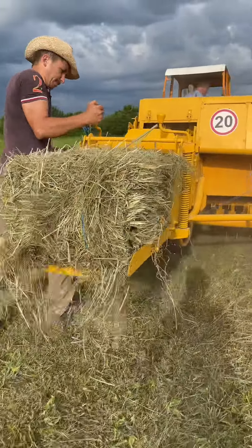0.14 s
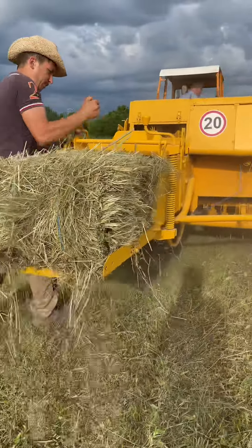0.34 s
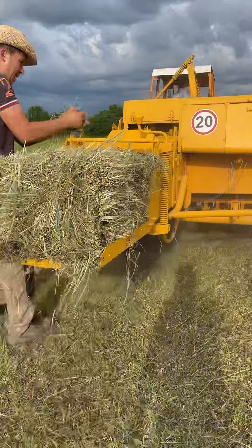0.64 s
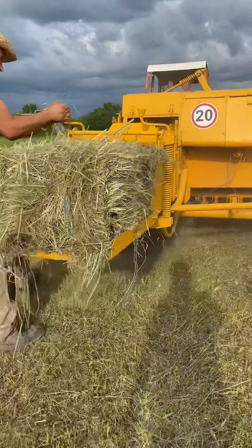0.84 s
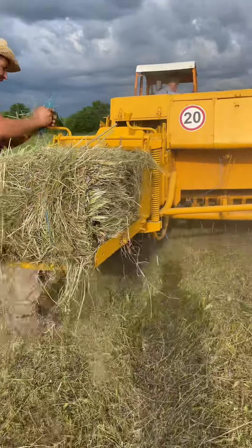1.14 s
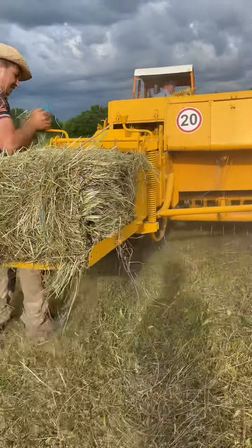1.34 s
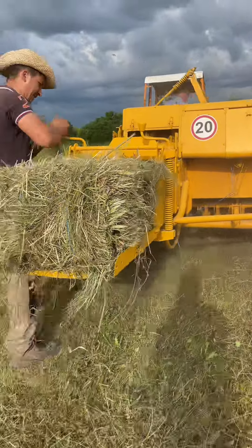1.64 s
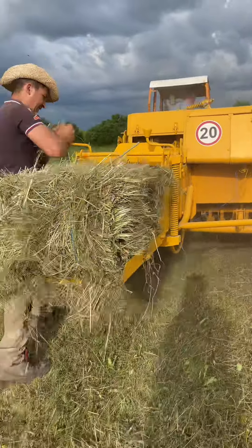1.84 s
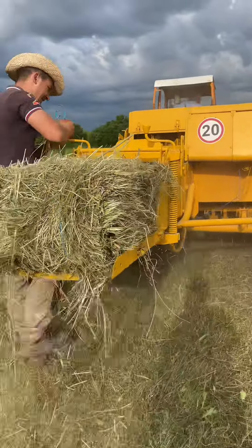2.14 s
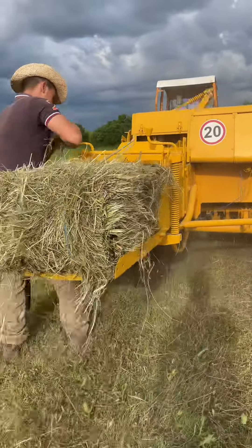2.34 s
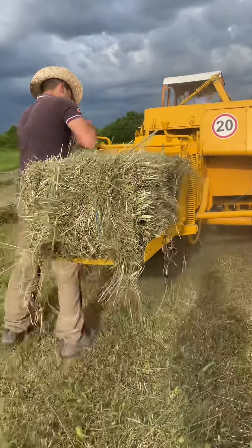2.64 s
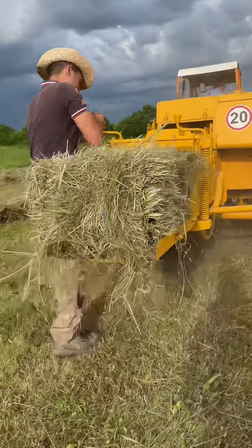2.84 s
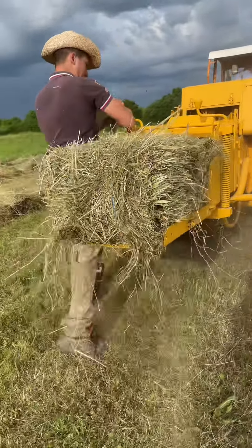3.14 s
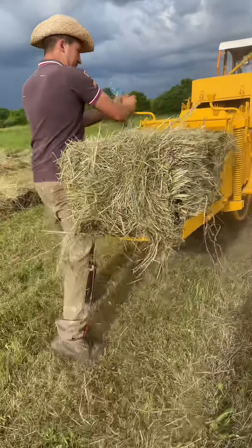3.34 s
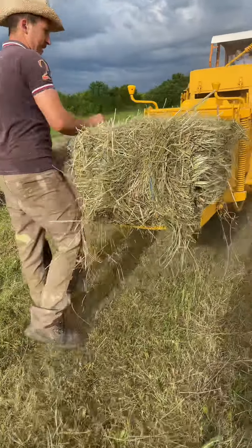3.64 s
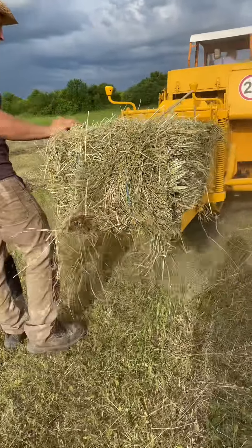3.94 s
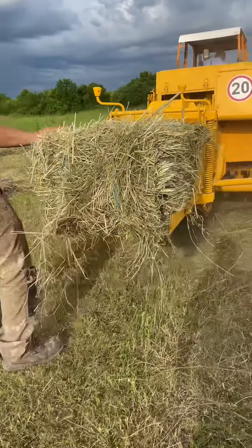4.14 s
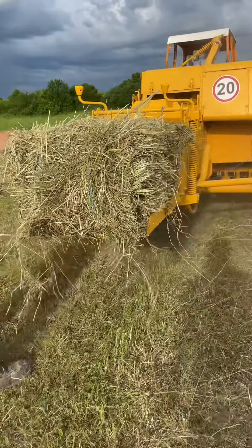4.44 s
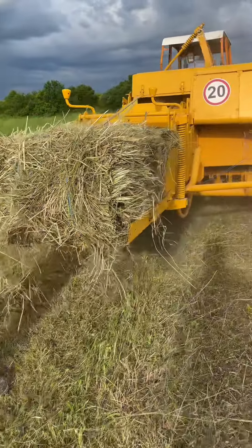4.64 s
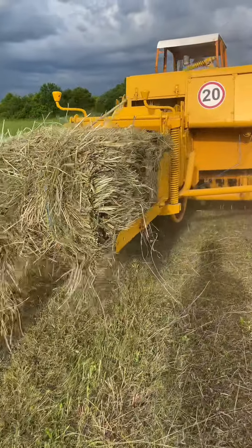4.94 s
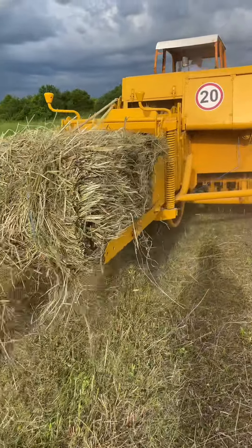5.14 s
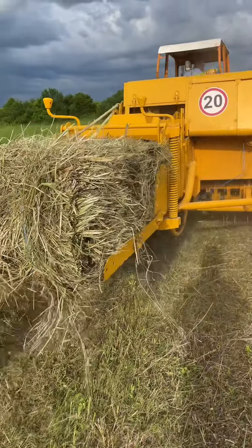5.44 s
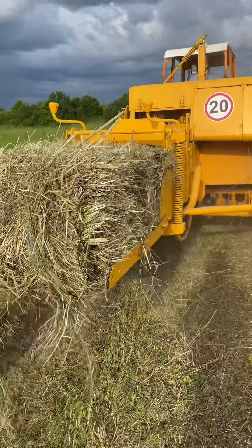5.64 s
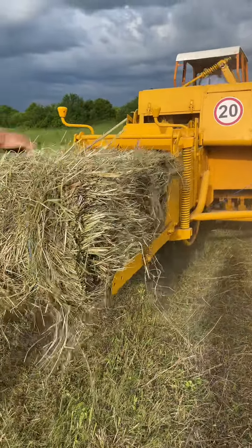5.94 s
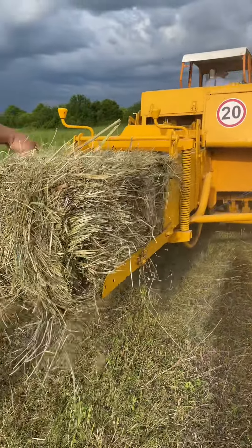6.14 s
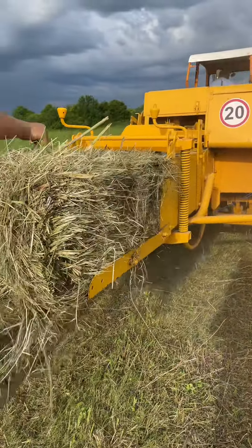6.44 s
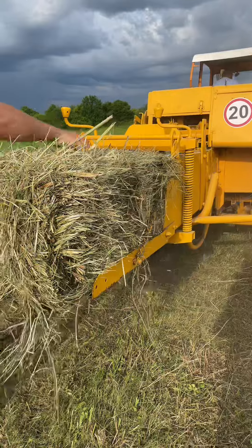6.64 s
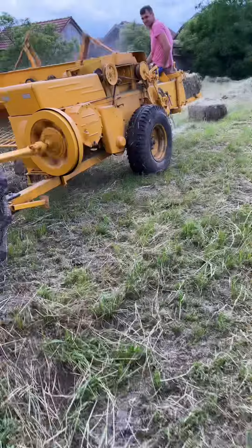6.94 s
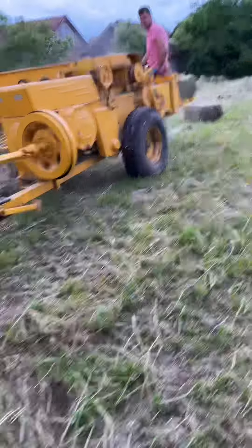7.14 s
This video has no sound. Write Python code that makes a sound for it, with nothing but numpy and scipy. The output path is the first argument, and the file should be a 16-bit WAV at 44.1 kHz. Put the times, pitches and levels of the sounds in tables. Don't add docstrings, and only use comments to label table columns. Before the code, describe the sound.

Outdoors in a hay field, close behind a working baler. A diesel drones and sags with each plunger stroke, sheet steel drums, chains and tines rattle, forks clank irregularly and dry joints give short squeaks. A hard knock lands about once a second. Near seven seconds the sound drops out for an instant, then a denser, brighter clatter from the machine's side closes it. Stereo handheld microphone, loud and slightly crushed.

```python
import sys
import numpy as np
from scipy import signal
from scipy.fft import rfft, irfft, next_fast_len
from scipy.io import wavfile
from scipy.ndimage import uniform_filter1d, map_coordinates

SR = 44100
rng = np.random.default_rng(int(sys.argv[2]) if len(sys.argv) > 2 else 0)


def store_pcm(level_fs):
    pcm = np.round(np.clip(level_fs, -1, 1) * 32767).astype(np.int16)
    wavfile.write(sys.argv[1], SR, np.atleast_2d(pcm).T)


def invert_db(x):
    u = np.asarray(x, float) / 20
    return 10 ** u


N = 320607

# time in seconds, firing rate in Hz, throttle level in dB.
ENGINE = [(0.0, 47.76, -21), (0.29, 54.77, -31.5), (0.55, 51.77, -29.5), (0.81, 51.16, -34),
          (1.22, 58.34, -22), (1.46, 57.2, -40), (1.8, 46.09, -19.5), (2.37, 56.98, -31.5),
          (2.74, 46.33, -23.5), (2.95, 51.8, -20), (3.28, 53.3, -28), (3.8, 39.65, -22),
          (4.29, 48.92, -22.5), (4.6, 43.76, -37), (4.9, 35.75, -21.5), (5.15, 45.51, -19),
          (5.49, 51.74, -26.5), (6.98, 42.83, -28.5)]
# frequency in Hz, level in dB per Hz.
EXHAUST = [(25, -39.5), (45, -7.5), (70, -1), (100, 1), (145, 0.5), (170, -4.5), (200, 0), (235, -6.5),
           (275, -9), (310, -7), (360, -12.5), (450, -20.5), (600, -27.5), (1000, -54.5)]
# share of the stroke from 0 to 1, load in dB, # exhaust boom in
# dB, chain slack in dB. From .83 onward the values of the knock row hold.
STROKE = [
    (0, 0, -13, 2.5),
    (.08, -2, -4, -1),
    (.18, 0.5, 3, -0.5),
    (.42, 1, -3.5, 2.5),
    (.64, -8, -0.5, 0.5),
    (.8, 1, 6, 4),
    (.88, 1, -4, 0),
    (.91, 3, -13.5, 3.5),
    (.96, -1.5, -9, 2),
]
# time in seconds, level in dB.
FEED = [(0, 2), (.8, 0.5), (2.2, -0.5), (4, -2), (5.2, -1), (5.85, 0), (6.1, -3), (6.42, -6), (6.6, -2),
        (6.8, -14), (6.98, -18)]
# start in seconds, peak in dB, T60 in seconds.
PLUNGER = [
    (0.839, -11, 0.16),
    (1.74, -15, 0.15),
    (2.706, -11, 0.21),
    (3.677, -13, 0.12),
    (4.832, -9, 0.14),
    (5.915, -11, 0.21),
    (6.245, -16.5, 0.1),
]
# frequency in Hz, level in dB per Hz.
THUMP = [(150, -39), (300, -5), (700, 3.5), (900, 0.5), (1300, 0.5), (2000, -9.5), (3000, -12.5),
         (4000, -19.5), (5000, -25), (9000, -38)]
# resonance in Hz, width in Hz, level in dB.
PANELS = [
    (673, 52, 13),
    (885, 120, -1),
    (1330, 95, -13.5),
    (308, 70, -17.5),
]
# frequency in Hz, level in dB per Hz.
DRUM = [(200, -39), (400, 1), (550, -5.5), (780, -0.5), (1000, -2), (1400, -10.5), (2000, -15), (3000, -17),
        (5000, -44.5)]
# frequency in Hz, level in dB per Hz.
CHAINS = [(600, -29), (1500, 0), (2400, -1.5), (3000, -1), (4400, -5.5), (5500, -7.5), (6500, -8),
          (8000, -11), (9000, -13), (10500, -17), (12000, -23), (13500, -27), (15600, -25.5)]
# start in seconds, peak in dB, ring in Hz, rattle stirred up in dB.
FORKS = [(0.153, -4, 1743, -28), (0.291, -23, 1870, -32), (0.445, -21, 1560, -47),
         (0.5925, -19, 1960, -35.5), (0.625, -18.5, 1190, -35.5), (1.025, -8.5, 1614, -30.5),
         (1.285, -12, 2093, -46), (1.473, -21.5, 1860, -38), (1.755, -10.5, 1870, -49.5),
         (1.8765, -13.5, 2130, -34.5), (1.9248, -25, 1600, -44), (2.8299, -13, 2166, -32),
         (2.9086, -8.5, 1700, -40), (3.1513, -13.5, 1265, -48.5), (3.251, -16.5, 1220, -36.5),
         (3.3364, -16, 1414, -40), (3.845, -18, 1744, -31), (4.025, -15.5, 900, -49),
         (4.371, -13, 1477, -49), (5.145, -15.5, 1526, -29), (5.175, -11, 1446, -36.5),
         (5.282, -21, 1590, -40), (5.744, -24, 1420, -40.5), (6.2197, -26, 1980, -34),
         (6.8712, -27.5, 1573, -48), (1.07, -15, 998, -42.5), (1.2, -20, 850, -48),
         (3.795, -20, 1510, -51.5), (3.822, -16.5, 993, -37.5), (5.188, -13.5, 896, -50.5),
         (6.232, -22, 1197, -44)]
# start in seconds, peak in dB, ring in Hz, rattle stirred up in dB.
LINKS = [(0.237, -7.5, 2840, -53), (0.31, -25, 2740, -43.5), (0.398, -22, 3120, -27.5),
         (1.1073, -14, 4890, -61), (1.429, -16, 3060, -32.5), (2.0836, -23.5, 2780, -28),
         (2.347, -22.5, 3610, -31), (2.21, -19, 2355, -48), (2.3866, -20.5, 3370, -44.5),
         (2.531, -13.5, 2310, -47), (2.713, -13, 3670, -41.5), (2.998, -25.5, 2950, -37.5),
         (3.46, -25, 2500, -37.5), (3.69, -29.5, 3600, -67), (4.085, -13.5, 4370, -31.5),
         (4.221, -15, 4920, -63), (4.407, -17.5, 2500, -35), (4.43, -16, 2350, -38.5),
         (4.454, -17.5, 5480, -55), (4.986, -16, 2500, -35.5), (4.952, -25.5, 2550, -38.5),
         (5.453, -18, 3160, -32.5), (5.555, -14, 3210, -43.5), (5.697, -16.5, 3610, -46),
         (6.286, -21, 3090, -56), (6.52, -26, 3430, -40), (6.6832, -27.5, 2450, -36.5),
         (6.79, -23, 2210, -43), (6.933, -14, 5560, -37), (0.934, -24.5, 3500, -40.5),
         (1.255, -21.5, 3290, -39), (1.305, -20, 2275, -49), (3.558, -18, 3010, -42.5),
         (3.768, -26.5, 3750, -57), (3.875, -21.5, 2580, -45.5), (3.905, -23, 2300, -53),
         (5.015, -21, 3000, -48), (5.21, -20.5, 2250, -46), (3.6, -24, 2590, -55)]
# start in seconds, length in seconds, pitch in Hz, level in dB, overtones in dB.
SQUEAKS = [(0.219, 0.017, 2780, -23, -24), (0.788, 0.024, 2047, -21.5, -9.5),
           (0.855, 0.033, 2008, -9.5, -9.5), (0.886, 0.1, 2008, -24.5, -30.5),
           (0.886, 0.035, 2015, -33, 1.5), (1.673, 0.025, 2049, -22, -5.5), (2.622, 0.026, 2055, -22.5, -6),
           (2.898, 0.022, 1680, -22, -23), (3.576, 0.016, 2080, -22, -6.5), (3.689, 0.074, 2865, -29, -3.5),
           (4.09, 0.054, 3000, -29.5, -10), (4.151, 0.031, 2996, -25, -10.5), (4.318, 0.16, 2990, -36, -28),
           (4.584, 0.042, 2223, -23, -13), (4.734, 0.026, 2027, -21, -7), (4.84, 0.076, 3800, -39, 2),
           (5.461, 0.1, 3190, -29.5, -23.5), (5.821, 0.028, 1997, -18.5, -9),
           (5.937, 0.075, 3840, -32, -14), (6.452, 0.085, 3526, -27, -10)]
# start in seconds, peak in dB, pitch in Hz.
BOOMS = [(0.17, -2, 184), (0.763, -17.5, 208), (1.025, -7, 150), (1.189, -7, 136), (1.638, -11, 146),
         (1.941, -3.5, 151), (2.627, 0.5, 190.6), (2.855, -7, 310), (2.989, -15.5, 131), (3.81, -9.5, 170),
         (4.842, -14.5, 203.5), (5.195, -4, 172), (5.794, 0, 185), (6.003, -15, 160), (0.27, -11.5, 103),
         (0.621, -6.5, 196.5), (0.93, -6, 104), (1.101, -3, 209), (1.972, -10, 201), (2.5, -10, 109.4),
         (3.5, -8.5, 199), (3.861, -3.5, 88), (4.17, -12, 202.6), (4.7, -8.5, 126), (5.07, -9.5, 89),
         (5.65, -16.5, 308), (5.8, -8.5, 101), (6.03, -10.5, 252), (6.128, -11, 96), (6.28, -8, 150),
         (6.42, -8.5, 99.6)]
# start in seconds, peak in dB, ring in Hz, T60 in seconds.
PINGS = [(0.227, -14.5, 2810, .06), (0.292, -19.5, 6400, 0.071), (0.31, -18.5, 2790, 0.027),
         (0.31, -12.5, 4620, 0.042), (0.572, -24, 2840, .04), (0.83, -22, 4020, .03),
         (0.933, -27, 3620, .03), (1.013, -22, 2860, 0.033), (1.406, -24.5, 3100, 0.11),
         (1.575, -28, 2130, .04), (1.58, -23, 4080, 0.045), (1.857, -23, 2020, .03), (1.9, -25, 6200, .05),
         (1.995, -23, 6300, 0.037), (1.99, -22, 3070, .05), (2.082, -20.5, 4260, 0.057),
         (2.13, -28, 6270, .2), (2.265, -29, 5530, .1), (2.36, -25, 6300, .06), (2.704, -26, 5580, 0.088),
         (2.82, -22, 3060, .04), (2.835, -22.5, 3080, .1), (3.198, -26, 1690, 0.036),
         (3.659, -28.5, 1680, .03), (4.167, -19.5, 3020, 0.044), (4.818, -22, 2840, 0.033),
         (4.831, -18.5, 2760, .05), (5.133, -26, 3190, .04), (5.273, -17, 2790, 0.048),
         (5.793, -22, 3580, .04), (5.817, -16.5, 6460, .07), (5.85, -28.5, 4120, 0.11),
         (5.941, -23, 980, 0.036), (5.946, -23, 1470, 0.046), (6.04, -23, 2590, 0.067),
         (6.135, -24.5, 847, .15), (6.255, -17, 910, 0.093), (6.295, -24.5, 5780, 0.065),
         (6.41, -27.5, 2800, .05), (6.478, -21, 3540, 0.087), (0.237, -16, 4570, .025),
         (0.24, -19, 1490, .025), (0.165, -22, 3260, .12), (2.908, -18, 1710, .03), (2.715, -24, 3880, .05),
         (4.453, -21, 6140, .04), (5.176, -17, 2900, .03), (4.845, -16.5, 854, .12), (3.69, -18, 700, 0.13),
         (1.03, -22, 3110, .06)]
# time in seconds, clatter in dB, drumming in dB.
BESIDE = [
    (6.986, -22, -24.5),
    (7.01, -17, -20.5),
    (7.27, -25.5, -23),
]
# frequency in Hz, level in dB per Hz.
SIDE_DRUM = [(30, -53), (55, -13), (85, 2), (200, -3), (300, -6.5), (450, -10.5), (800, -68)]
# frequency in Hz, level in dB per Hz.
SIDE_STEEL = [(200, -24), (450, -7.5), (800, -5.5), (1000, -9.5), (1400, -7), (2000, -11.5), (3000, -7),
              (4400, -18), (5500, -23.5), (6500, -23.5), (8000, -29.5), (10500, -26), (13500, -36),
              (15600, -38)]
# start in seconds, peak in dB.
SIDE_HITS = [
    (6.986, -10.5),
    (7, -8),
    (7.015, -3.5),
    (7.026, -11),
    (7.05, -14.5),
    (7.116, -18.5),
    (7.25, -18),
]
# frequency in Hz, level in dB.
SIDE_TONES = [
    (85, -27),
    (235, -29),
    (425, -28),
    (480, -31.5),
    (629, -27.5),
    (1324, -36.5),
]
# frequency in Hz, left over right in dB,
# left lead in radians, likeness from 0 to 1.
BEHIND = [(60, 0, .06, 1), (307, 0, .03, 1), (405, 0, -.1, 1), (455, -1, -0.95, 1), (598, 4.5, 0.8, 0.82),
          (736, 1.5, -0.5, 1), (1090, 2, 0.5, 0.99), (2000, 1.7, 0, 0.96), (2500, 0, 0, 0.86),
          (3020, -6.5, 1.1, 0.1), (3750, -3.5, 0.12, 0.73), (4400, -1.5, 0.83, 0.5),
          (6200, 0.5, 1.29, 0.69), (9020, 0.5, 3, 0.73), (10700, 1.5, 2.5, 0.95), (13500, -3.5, 3, 0.93),
          (15500, -1, 4.5, 0.5)]
# frequency in Hz, left over right in dB,
# left lead in radians, likeness from 0 to 1.
ABREAST = [(302, 0.5, 0.063, 1), (454, -2.5, 0.94, 0.93), (585, -1, 1.4, 0.44), (780, 4, 1.6, 0.3),
           (1014, 11, .3, 0.51), (1390, 5, 0.44, 0.97), (2500, 2.5, 2.5, 0.83), (3300, -0.5, 2.65, 0.95),
           (3450, 0, 3.0, .995), (3750, 0, 3.2, .995), (3950, 1.5, 3.5, 0.74), (4380, 2.5, 3.3, 0.43),
           (5460, 1, 0.72, 0.78), (6470, 0.5, 1.1, 0.5), (9140, -2.5, 2.95, 0.63), (10000, -3, 3.1, 1),
           (13800, 3.5, 3.14, 0.97), (15700, -0.5, 3.6, 0.52)]
# frequency in Hz, level in dB per bin.
MID_FLOOR = [(3000, -88), (3600, -71), (4200, -90), (7000, -100), (8300, -83), (9300, -68.5),
             (10000, -65.5), (14000, -67.5), (15200, -83.5)]
# frequency in Hz, level in dB per bin.
SIDE_FLOOR = [(200, -73.5), (400, -86.5), (1000, -65.5), (1700, -69), (2500, -78.5), (11000, -95.5),
              (13000, -86), (15000, -73.5)]
SHARP = [.295, 1.112, 1.775, 4.222, 4.465]

GAP_START_S, GAP_END_S = 6.9762, 6.9846


def unit(x):
    return x / np.sqrt(np.mean(x ** 2) + 1e-20)


def columns(rows, at):
    first, *cols = np.transpose(rows)
    return [np.interp(at, first, c) for c in cols]


def curves(rows):
    return columns(rows, np.arange(N) / SR)


def along(points, hz):
    p = np.array(points, float)
    return columns(np.column_stack([np.log(p[:, 0]), p[:, 1:]]), np.log(hz + 1))


def wobble(rate):
    knots = rng.standard_normal(int(N * 400 / SR) + 4)
    return map_coordinates(knots, [np.arange(N) * min(rate, 400) / SR])


def wander(*shape):
    return np.cumsum(rng.standard_normal(shape), axis=-1)


def decay(t, t60):
    return invert_db(-60 * t / t60)


def span(s, length):
    return slice(round(s * SR), round(s * SR) + length)


def filtered(x, response):
    m = next_fast_len(x.shape[-1] + SR // 8)
    return irfft(rfft(x, m) * response(np.fft.rfftfreq(m, 1 / SR)), m)[..., :x.shape[-1]]


def rush(spectrum, patchy_db, gate=1, size=N):
    z = signal.stft(rng.standard_normal((2, size)) * gate, nperseg=512)[2]
    field = uniform_filter1d(rng.standard_normal(z.shape[1:]), 5, 0)
    field = uniform_filter1d(field, 6, 1)
    pair = signal.istft(z * invert_db(patchy_db * unit(field)), nperseg=512)[1][:, :size]
    return unit(filtered(pair, lambda hz: invert_db(along(spectrum, hz)[0])))


def stroke():
    knocks = [-.06] + [row[0] for row in PLUNGER[:-1]] + [6.98]
    phase = np.interp(np.arange(N) / SR, knocks, np.arange(len(knocks))) % 1
    return columns(STROKE + [(0.83, *STROKE[0][1:])], phase)


def engine(rough, puff_share):
    hz, throttle_db = curves(ENGINE)
    load_db, boom_db, _ = stroke()
    feed_db, = curves(FEED)
    first_db = -28.5 + boom_db + 0.99 * (throttle_db - throttle_db.mean()) + 0.6 * (hz - hz.mean())
    half_db = -28.5 + 0.52 * load_db
    turn = np.cumsum(hz) / SR
    orders = 0
    for k, db in ((1, first_db + .1), (3 / 2, half_db - 0.5), (2, throttle_db), (4, throttle_db - 12)):
        level = invert_db(db + 0.5 + 0.24 * feed_db + 2.8 * rough * wobble(7))
        orders = orders + level * np.sin(2 * np.pi * k * turn + rough * 0.25 * k * wobble(9))
    fired = np.diff(np.floor(turn + .05 * wobble(40)), prepend=0) > 0
    uneven = fired * invert_db(6.5 * wobble(60))
    pulses = unit(filtered(uneven, lambda f: invert_db(along(EXHAUST, f)[0]) * (f > 120)))
    puffs = rush(EXHAUST, patchy_db=1.12, gate=invert_db(np.cos(2 * np.pi * turn)))
    drumming = np.sqrt(1 - puff_share) * pulses + np.sqrt(puff_share) * puffs
    return orders + invert_db(-17 + load_db + feed_db) * drumming


def steel(f):
    return sum((-1) ** k * invert_db(db) * 1j * f * w / (c * c - f * f + 1j * f * w)
               for k, (c, w, db) in enumerate(PANELS))


def plunger():
    t, out = np.arange(SR // 3) / SR, np.zeros((2, N))
    ringing = unit(filtered(rng.standard_normal((2, N)), steel))
    body = invert_db(1.5 * wobble(76)) * (rush(DRUM, patchy_db=5.0) + 0.7 * ringing)
    thump = rush(THUMP, patchy_db=-2.5)
    for s, db, t60 in PLUNGER:
        at = span(s, len(t))
        crack = decay(np.maximum(t - .006, 0), 0.017) * np.clip(t / 0.003, 0, 1)
        shudder = decay(t, 1.52 * t60) * np.clip(t / 0.0011, 0, 1)
        for shape, noise, level in ((crack, thump, -3), (shudder, body, -8)):
            out[:, at] += invert_db(db + level) * np.sqrt(np.mean(shape ** 2)) * unit(shape * noise[:, at])
    return out


def surges(rise_s, t60):
    s, _, _, db = np.transpose(FORKS + LINKS)
    t = np.arange(SR // 2) / SR
    kicks = np.bincount(np.round(s * SR).astype(int), invert_db(db), N)
    return np.abs(signal.fftconvolve(kicks, np.clip(t / rise_s, 0, 1) * decay(t, t60))[:N])


def rattle():
    load_db, _, slack_db = stroke()
    feed_db, = curves(FEED)
    surge = surges(rise_s=0.017, t60=0.24)
    chain = invert_db(-41 + slack_db + feed_db) + surge + invert_db(-55)
    panel = invert_db(-30 + 0.92 * load_db + feed_db) + invert_db(-2) * surge + invert_db(-45.5)
    shake = wobble(22.04)
    other_shake = np.roll(shake, N // 3)[::-1]
    ticks = invert_db(np.minimum(6 * rng.exponential(size=N), 18)) * (rng.random(N) < .01)
    ticks = signal.lfilter([1], [1, -.97], ticks)
    panels = panel * invert_db(1.56 * shake + 0.94 * other_shake) * rush(DRUM, patchy_db=1.5)
    chains = rush(CHAINS, patchy_db=3.0, gate=1 + 0.32 * unit(ticks))
    return panels + chain * invert_db(5.0 + 1.57 * shake) * chains


def clanks(t60):
    burst, shove, ring = np.zeros(N + SR), np.zeros((2, N + SR)), np.zeros((2, N + SR))
    t = np.arange(SR // 5) / SR
    fall = decay(t, t60) * (1 - np.exp(-t / 0.003))
    gather = 1 - np.exp(-t / .007)
    for s, db, hz, _ in FORKS + LINKS:
        at = span(s, len(t))
        burst[at] += invert_db(db - 12.0) * fall * gather + invert_db(db - 10.5) * fall ** 6
        shove[:, at] += invert_db(db - 4.5) * fall ** 3 * rng.standard_normal((2, len(t)))
        blur = wander(2, len(t)) * 0.11 * (hz / 2000) ** 0.91
        turn = 2 * np.pi * hz * t
        tone = np.sin(turn + blur) + 0.57 * np.sin(1.62 * turn + 2 * blur)
        ring[:, at] += invert_db(db - 8.0) * (0.75 * fall ** 0.87 + 0.89 * fall ** 3) * tone
    return burst[:N] * rush(CHAINS, patchy_db=0.0) + filtered(shove[:, :N], steel) + ring[:, :N]


def squeaks(flutter_db):
    out = np.zeros((2, N + SR))
    t, drift = np.arange(SR // 3) / SR, wobble(300)
    flutters = [wobble(110) for _ in range(3)]
    for s, length, hz, db, over_db in SQUEAKS:
        second_db = over_db - 1.1 * max(db + 19.5, 0)
        third_db = over_db - 10.5 * (hz / 1000 - 2)
        at = span(s, len(t))
        rough = .03 / length + .4 - .1 * max(db + 24, 0) + .1 * np.clip(-28 - db, 0, 5)
        rough = np.clip(rough, .35, 2)
        if length > .09 and db > -27:
            rough = rough * .35
        release = decay(np.maximum(t - length, 0), .045)
        grip = np.clip(t / (0.15 * length), 0, 1) * invert_db(-4 * t / length) * release
        turn = np.cumsum(hz * (1 + .008 * rough * drift[at])) / SR
        short = length < .05
        blur = wander(5, len(t)) * (.03 + .035 * rough ** 2 if short else .018 * rough)
        for k, level in enumerate((0, second_db, third_db, third_db - 8, third_db - 8)):
            uneven = grip * invert_db(flutter_db * rough * flutters[k % 3][at])
            size = invert_db(db + level) * np.sqrt(np.mean(grip ** 2)) * unit(uneven)
            smear = (k + 1) ** (1 if short else .5) * blur[k]
            out[:, at] += size * np.sin(2 * np.pi * ((k + 1) * turn + rng.random((2, 1))) + smear)
    return out[:, :N]


def booms(t60, rise_s):
    out, t = np.zeros(N + SR), np.arange(SR // 4) / SR
    shape = decay(t, t60) * (1 - np.exp(-t / rise_s))
    for s, db, hz in BOOMS:
        blur = wander(len(t)) * 0.031
        out[span(s, len(t))] += invert_db(db - 3.5) * shape * np.sin(2 * np.pi * hz * t + blur)
    return out[:N] * [[1], [0]]


def pings(rise_s):
    out, t = np.zeros((2, N + SR)), np.arange(SR // 5) / SR
    for s, db, hz, t60 in PINGS:
        blur = wander(2, len(t)) * 0.07 * np.sqrt(hz / 2000)
        shape = decay(t, t60) * (1 - np.exp(-t / rise_s))
        out[:, span(s, len(t))] += invert_db(db) * shape * np.sin(2 * np.pi * hz * t + blur)
    return out[:, :N]


def ports(pair, table):
    def gains(hz):
        lean_db, lead, alike = along(table, hz)
        turn = np.arccos(np.clip(alike, 0, 1)) / 2
        left = invert_db(lean_db / 2) * np.exp(.5j * lead)
        return np.array([[left * np.cos(turn), left * np.sin(turn)],
                         [np.cos(turn) / left, -np.sin(turn) / left]])
    return filtered(pair, gains).sum(1)


def side_view():
    start = round(GAP_END_S * SR)
    t = np.arange(start, N) / SR
    steel_db, drum_db = (c[start:] for c in curves(BESIDE))
    drum = invert_db(drum_db) * rush(SIDE_DRUM, patchy_db=-3.5, size=N - start)
    teeth_db = np.exp(-(t - GAP_END_S) / 0.22) * np.cos(2 * np.pi * 75.9 * (t - 6.988))
    knocks = sum(invert_db(db - 10.5) * decay(np.maximum(t - s, 0), 0.037) * (t > s) for s, db in SIDE_HITS)
    clatter = invert_db(steel_db + 1.5 + wobble(120)[start:] + teeth_db) + knocks
    clatter = clatter * rush(SIDE_STEEL, patchy_db=2.0, size=N - start)
    waver = wander(len(SIDE_TONES), len(t)) * 0.026
    hum = sum(invert_db(db + 3) * np.sin(2 * np.pi * hz * t + w) for (hz, db), w in zip(SIDE_TONES, waver))
    heard = ports(drum + clatter + hum * [[1], [.3]], ABREAST)
    return np.pad(heard, ((0, 0), (start, 0)))


def scene():
    t = np.arange(N) / SR
    machine = engine(rough=1.32, puff_share=0.92) + plunger() + rattle()
    parts = clanks(t60=0.085) + squeaks(flutter_db=3.0) + booms(t60=0.18, rise_s=0.01) + pings(rise_s=0.0033)
    behind = ports(machine + parts, BEHIND) * np.clip((GAP_START_S - t) / 0.0008, 0, 1)
    return behind + side_view() * np.clip((t - GAP_END_S) / 0.0014, 0, 1)


def starved(x, floor, sharp=()):
    hz, t, z = signal.stft(x, SR, nperseg=2048)
    band = np.minimum(np.sqrt(hz / 4), hz / 120).astype(int)
    power = np.array([np.mean(np.abs(z[band == b]) ** 2, axis=0) for b in range(band[-1] + 1)])
    loud = power[18:45].mean(0) + 1e-20
    unsteady = invert_db(2 * 4.0 * rng.standard_normal(power.shape))
    power = (power * (np.median(loud) / loud) ** .9 * unsteady)[band]
    spared = invert_db(-4) * sum(np.clip(2 - np.abs(t - s) / 0.009, 0, 1) for s in sharp)
    kept = np.maximum(power > invert_db(2 * along(floor, hz)[0])[:, None], spared)
    return signal.istft(z * kept, SR, nperseg=2048)[1][:N]


def dry_snap():
    after = np.arange(N) / SR - 6.872
    snap = invert_db(-36.5) * decay(np.abs(after), .012) * (after > 0) * rng.standard_normal(N)
    return filtered(snap, lambda hz: np.clip(hz / 5000, 0, 1) ** 2 * (hz < 16600))


def top_cut(x):
    return signal.sosfilt(signal.butter(12, 17130, fs=SR, output="sos"), x)


def record(dry):
    limited = dry / (1 + np.abs(dry) ** 4) ** (1 / 4)
    x = filtered(limited, lambda hz: hz < 15830)
    mid = starved(x.mean(0), MID_FLOOR, SHARP) + dry_snap()
    side = starved((x[0] - x[1]) / 2, SIDE_FLOOR)
    return top_cut(np.array([mid + side, mid - side]))


dry = scene()
out = record(dry)
store_pcm(out)
```